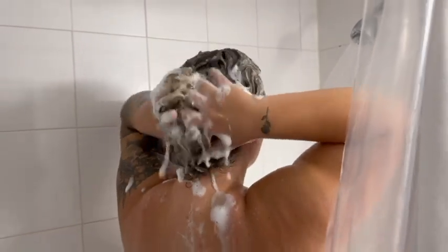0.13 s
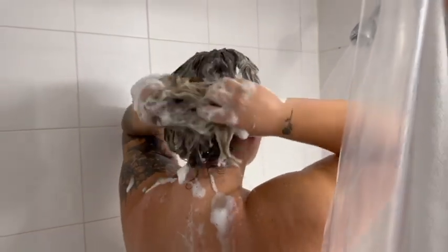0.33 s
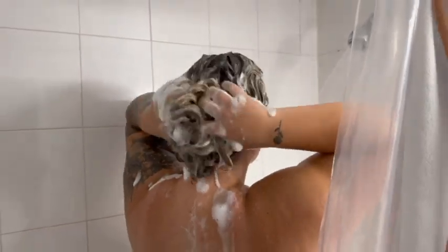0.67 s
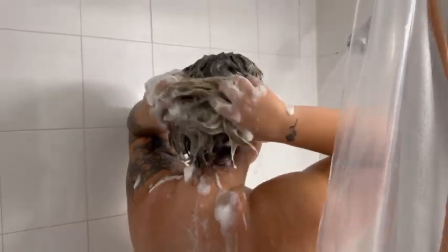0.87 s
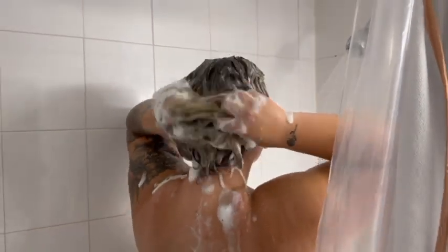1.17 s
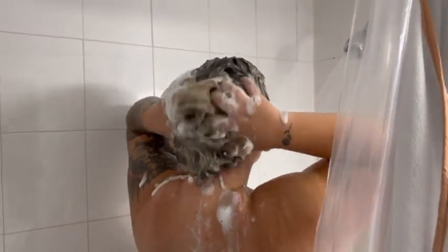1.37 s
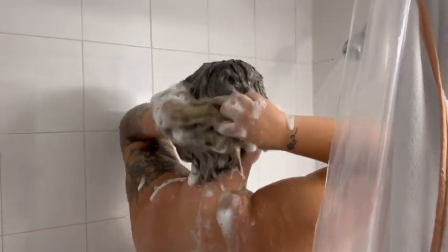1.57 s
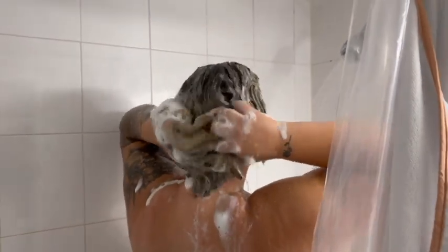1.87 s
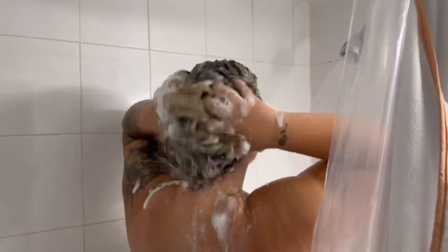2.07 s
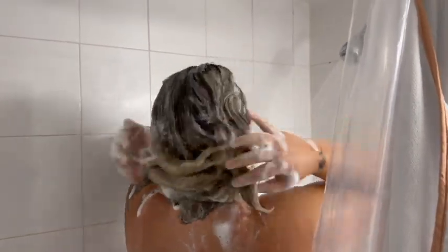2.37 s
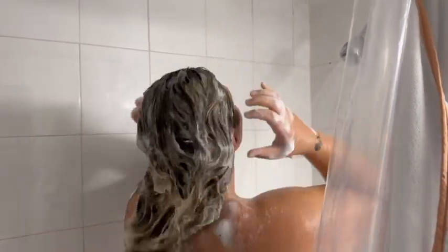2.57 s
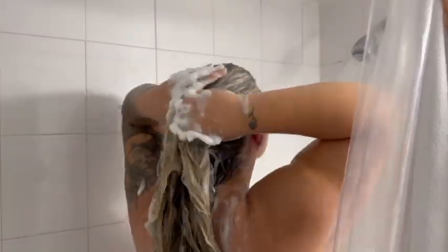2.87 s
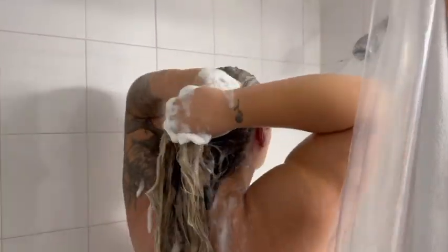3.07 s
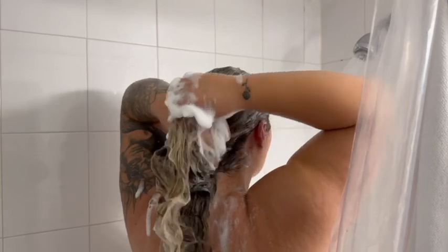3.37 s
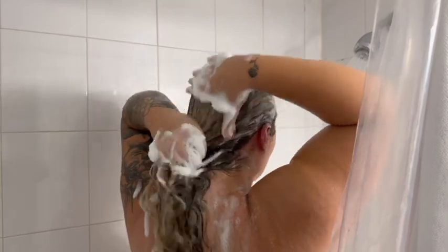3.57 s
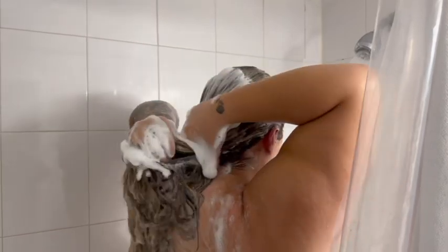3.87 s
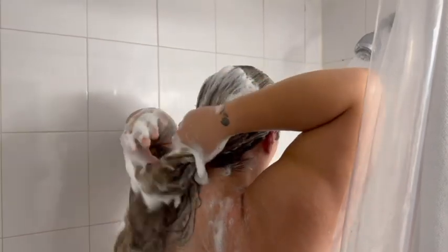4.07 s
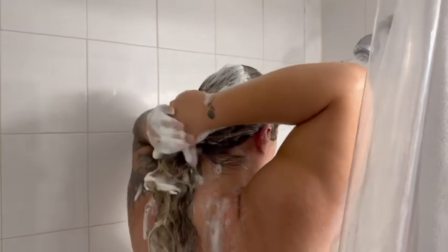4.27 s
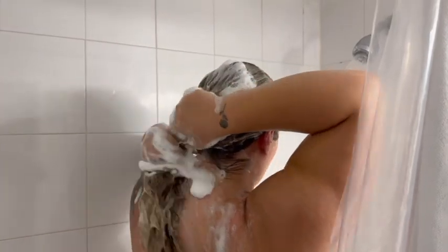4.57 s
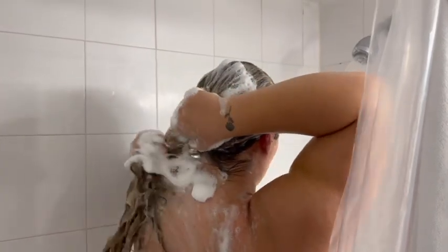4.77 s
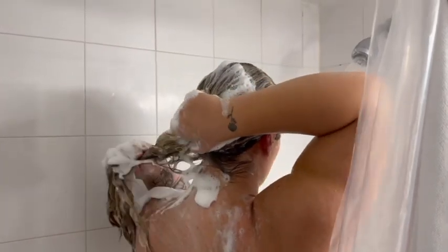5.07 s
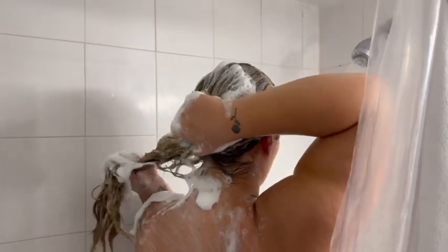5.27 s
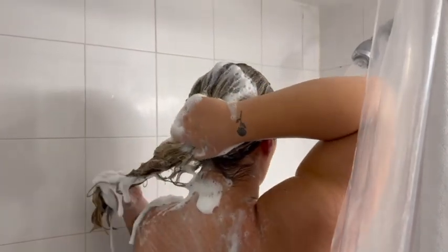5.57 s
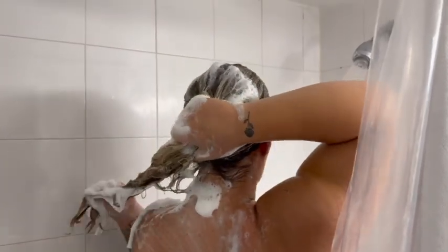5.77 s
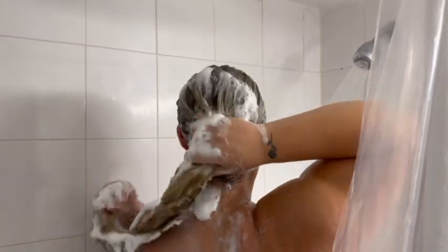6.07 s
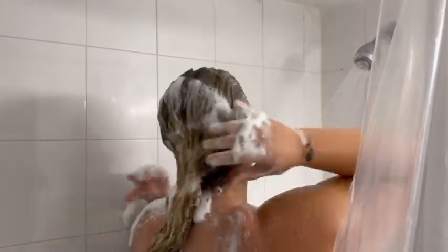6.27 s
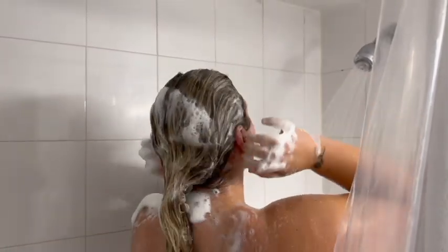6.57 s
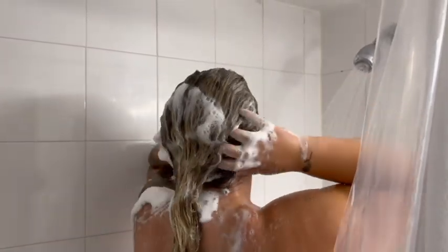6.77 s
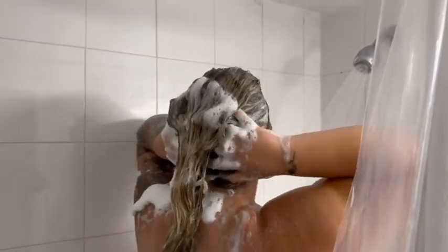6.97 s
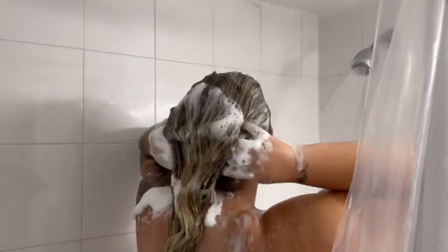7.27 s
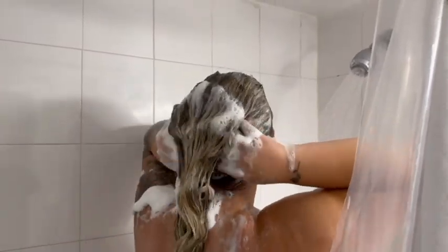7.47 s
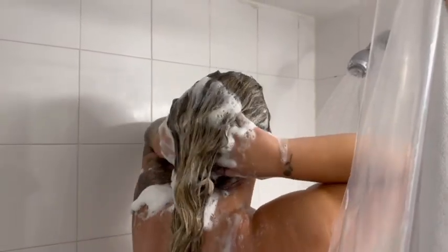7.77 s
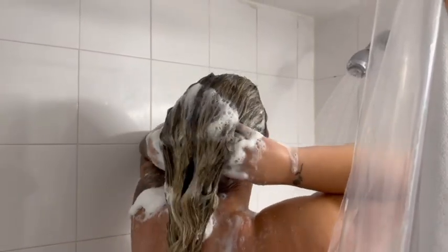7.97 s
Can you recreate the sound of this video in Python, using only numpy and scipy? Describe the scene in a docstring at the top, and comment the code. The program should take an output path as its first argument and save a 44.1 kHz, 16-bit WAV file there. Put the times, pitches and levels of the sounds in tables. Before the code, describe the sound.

A shower runs in a hard, short-echoing stall, heard by a nearby stereo microphone. Under it lies a low mechanical fan hum and a soft boomy air rumble that swells now and then. Hands working lather give sharp little squelchy splats, slightly stronger on the left. A sudden cut just before three seconds jumps to a fuller, hissier spray, which later fades back to a quieter patter with three low bubbles.

```python
"""From the start a fan hums as shaft harmonics; a tiled shower drums, patters and hisses as shaped noise.
Bubbles ring as rising sines. Hands work lather through wet hair, and blobs of foam and water splat on the
tiles as decaying noise bursts. At 2.74 s the sound breaks off and fades in louder; it later sinks slowly,
with three large bubbles from 6.4 s on."""
import sys
import numpy as np
from scipy import signal
from scipy.fft import rfft, irfft, next_fast_len
from scipy.io import wavfile
from scipy.ndimage import uniform_filter1d, map_coordinates

SR = 44100
rng = np.random.default_rng(int(sys.argv[2]) if len(sys.argv) > 2 else 0)


def generate_wav(sig):
    """Save sig (samples, or channels by samples) to the path in sys.argv[1] as 16-bit PCM at SR."""
    pcm = np.round(np.clip(np.atleast_2d(sig).T, -1, 1) * 32767).astype(np.int16)
    wavfile.write(sys.argv[1], SR, pcm)


N = 358517


def amp(db):
    """Decibel law: level to amplitude ratio."""
    return 10 ** (np.asarray(db) / 20)


def unit(x):
    """Normalisation to an rms of 1."""
    return x / np.sqrt(np.mean(x ** 2) + 1e-20)


def along(points, hz):
    """Logarithmic pitch scale: each column after the frequency, interpolated on a log axis."""
    f, *columns = np.transpose(points)
    return np.squeeze([np.interp(np.log(hz + 1), np.log(f + 1), c) for c in columns])


def curves(rows):
    """Linear interpolation in time: one value per sample for each column after the time."""
    s, *columns = np.transpose(rows)
    return [np.interp(np.arange(N) / SR, s, c) for c in columns]


def wobble(rate):
    """Band-limited fluctuation: a smooth random curve with `rate` knots a second."""
    knots = rng.standard_normal(int(N * rate / SR) + 4)
    return map_coordinates(knots, [np.arange(N) * rate / SR])


def filtered(x, response):
    """Linear filtering: the spectrum of x times a complex response of frequency."""
    m = next_fast_len(N + SR // 2)
    return irfft(response(np.fft.rfftfreq(m, 1 / SR)) * rfft(x, m), m)[..., :N]


def rush(spectrum, patchy_db, grain_db):
    """Superposed random impacts: two noises, jointly rms 1, sharing gain patches and rapid roughness."""
    drops = rng.standard_normal((2, N)) * amp(grain_db * wobble(300))
    z = signal.stft(drops, nperseg=512)[2]
    patches = uniform_filter1d(rng.standard_normal(z.shape[1:]), 6, 0)  # smooth in frequency
    patches = uniform_filter1d(patches, 10, 1)  # smooth in time
    pair = signal.istft(z * amp(patchy_db * unit(patches)), nperseg=512)[1][:, :N]
    return unit(filtered(pair, lambda hz: amp(along(spectrum, hz))))


# Level courses before each layer's offset: (time [s], drumming and fan level [dB], patter level [dB])
LOUDNESS = [(0, -44.5, -52.5), (1, -45, -53), (2.2, -43.5, -50.5), (2.737, -46, -52.5), (2.743, -36, -41.5),
            (3.5, -34.5, -43), (4.3, -35, -45.5), (5.3, -35.5, -48.5), (6, -39.5, -52), (6.5, -42, -54),
            (7.2, -42, -50.5), (8.13, -45.5, -53)]
# Harmonics of the fan shaft: (shaft order [-], relative level [dB])
FAN_ORDERS = [(2, -22), (5, -39), (8, 1.5), (9, -9), (10, -14.5), (13, -7.5), (14, -2.5), (16, -8),
              (18, -12.5), (22, -11.5), (24, -17), (26, -8.5), (32, -9.5), (38, -17), (52, -16)]
SHAFT_HZ = 25.895


def fan():
    """Rotating machinery: unsteady harmonics of the shaft rate, further apart in phase at higher orders."""
    t = np.arange(N) / SR
    hum = np.zeros((2, N))
    for order, db in FAN_ORDERS:
        apart = 0.066 * round(order) * np.array([[-.5], [.5]])  # left and right phase, rad
        phase = rng.uniform(0, 2 * np.pi) + 0.093 * wobble(3) + apart
        tone = np.sin(2 * np.pi * round(order) * SHAFT_HZ * t + phase)
        hum += amp(db + 0.14 * wobble(2.9)) * tone
    return amp(curves(LOUDNESS)[0] - 1.5) * unit(hum)


# Spectrum of water on the tub: (frequency [Hz], relative density [dB per Hz])
TUB_SPECTRUM = [(35, -23), (90, -15), (190, -2.5), (310, -3), (352, 7.5), (400, -1.5), (850, -7),
                (1300, -35), (4000, -36)]
DRUM_GROWS_DB_PER_S = 0.19  # growth relative to the fan


def drumming():
    """Impact noise on a tub: noise in the tub's spectrum, slowly gaining on the fan."""
    t = np.arange(N) / SR
    level_db = curves(LOUDNESS)[0] - 5.0 + DRUM_GROWS_DB_PER_S * t + 0.07 * wobble(10.0)
    return amp(level_db) * rush(TUB_SPECTRUM, patchy_db=1.8, grain_db=1.5)


# Spectrum of drops on skin and curtain: (frequency [Hz], relative density [dB per Hz])
PATTER_SPECTRUM = [(300, -45), (900, 2), (1300, 0.5), (1800, -1), (3200, -17), (16000, -64)]


def patter():
    """Soft-surface impact noise: drops on skin and curtain as band-shaped noise."""
    return amp(curves(LOUDNESS)[1]) * rush(PATTER_SPECTRUM, patchy_db=2.6, grain_db=1.5)


# Low air mode of the stall: (centre frequency [Hz], width of each resonator [Hz])
AIR_MODE = (131, 33)
# Swells of the air mode: (time [s], half length [s], rise [dB])
SWELLS = [(0.03, .1, 12), (0.512, 0.21, 12.5), (1.803, 0.29, 5.5), (2.493, 0.29, 9), (3.75, 0.7, 9.5),
          (5.144, 0.2, 10.5), (6.02, 0.057, 14), (7.255, 0.034, 9), (7.83, 0.26, 16.5)]
REST_DB = -21.5  # air mode at rest, against the drumming's level course


def air_mode():
    """Room resonance: noise through two equal cascaded resonators, swelling and fading."""
    t = np.arange(N) / SR
    centre_hz, width_hz = AIR_MODE

    def resonator(hz):
        damping = 1j * hz * width_hz
        return damping / (centre_hz ** 2 - hz * hz + damping)

    swell_db = sum(db * np.exp(-((t - s) / half_s) ** 2) for s, half_s, db in SWELLS)
    level_db = curves(LOUDNESS)[0] + REST_DB + swell_db + 2.2 * wobble(3.68)
    noise = rng.standard_normal((2, N))
    return amp(level_db) * unit(filtered(noise, lambda hz: resonator(hz) ** 2))


# Spectrum of the fine spray: (frequency [Hz], relative density [dB per Hz])
SPRAY_SPECTRUM = [(1000, -30), (2500, -3), (5300, -3), (7500, -1), (9200, 1), (10800, 0), (12000, -8),
                  (15500, -13)]
# Level course of the spray, before gusts: (time [s], level [dB])
SPRAY_LEVEL = [(0, -53.5), (1.3, -57.5), (1.9, -50.5), (2.25, -57.5), (2.737, -55.5), (2.743, -42.5),
               (3.3, -43.5), (3.8, -44.5), (4.25, -41.5), (4.7, -47.5), (5.05, -57), (6.4, -59.5),
               (6.8, -48.5), (7.25, -57.5), (8.13, -49.5)]


def spray():
    """Fine-droplet noise: treble hiss modulated by random gusts."""
    gusts_db = 1.5 * wobble(9)
    return amp(curves(SPRAY_LEVEL)[0] + gusts_db) * rush(SPRAY_SPECTRUM, patchy_db=2.8, grain_db=3)


# Spectrum of the nozzle hiss: (frequency [Hz], relative density [dB per Hz])
JET_SPECTRUM = [(8000, -40), (11000, -49), (12200, 3.5), (16000, 9)]


def nozzles():
    """Jet noise: hiss of the nozzles, slowly fluctuating about a constant level."""
    return amp(-51.0 + 3.9 * wobble(3.42)) * rush(JET_SPECTRUM, patchy_db=4, grain_db=2.5)


def chirp(hz, t, cycles):
    """Bubble resonance: a soft onset, a rising pitch and a decay, with a peak near 1."""
    age = 4 * t * hz / cycles
    return age * np.exp(1 - age) * np.sin(2 * np.pi * hz * t * (1 + 0.012 * age))


BUBBLE_HZ, BUBBLE_SPREAD = 899.7, 0.5  # median pitch Hz, standard deviation of natural-log pitch
BUBBLE_CYCLES, BUBBLE_DB = 24.8, -4  # life in cycles, level against the patter dB


def bubbles(count=800):
    """Bubble resonance in running water: short chirps at random moments, each on one side."""
    u, t = rng.random((count, 3)), np.arange(SR // 20) / SR
    hz = BUBBLE_HZ * np.exp(BUBBLE_SPREAD * rng.standard_normal((count, 1)))
    ring = amp(14 * u[:, :1]) * chirp(hz, t, BUBBLE_CYCLES)
    start = (u[:, 1:2] * N).astype(int)
    side = (u[:, 2:] > .5) * (N + SR)  # the right channel follows the left in one long array
    at = start + np.arange(len(t)) + side
    pair = np.bincount(at.ravel(), ring.ravel(), 2 * (N + SR)).reshape(2, -1)[:, :N]
    return amp(curves(LOUDNESS)[1] + BUBBLE_DB) * unit(pair)


# Decay of the tiles' answer: (frequency [Hz], 60 dB decay time [s])
TILES = [(1000, 0.21), (5000, 0.24), (15000, 0.14)]
# Fine droplets thrown by a blob: (centre frequency [Hz], width [octaves])
FIZZ = (9640, 0.31)
CLUMP_MS, CLUMP_DB = 6, 1.8  # spacing and depth of droplet clumps
RAGGED_DB, PEAKED = 2.2, 1.6  # droplet scatter in pitch; band shape: 1 sharp core, 2 round top


def burst(body_db, body_hz, octaves, fizz_db, rise_ms):
    """Impact and reverberation: clumped droplets in a body band, fizz or both, dying band by band off tiles."""
    noise = rng.standard_normal((2, SR // 5))
    hz, t, z = signal.stft(noise, SR, nperseg=256, noverlap=192)

    def band(centre_hz, width):
        distance = np.abs(np.log2((hz + 1) / centre_hz) / width)
        return unit(np.exp(-distance ** PEAKED))

    ragged = uniform_filter1d(rng.standard_normal(z.shape[1:]), size=24, axis=1)  # smooth in time
    ragged = uniform_filter1d(ragged, size=3, axis=0)  # smooth in frequency
    bands = amp(body_db) * band(body_hz, octaves) + amp(fizz_db) * band(*FIZZ)
    colour = bands[:, None] * amp(RAGGED_DB * unit(ragged - ragged.mean()))
    decay = amp(-60 * t / along(TILES, hz)[:, None])
    sound = signal.istft(z * colour * decay, SR, nperseg=256, noverlap=192)[1]
    t = np.arange(sound.shape[1]) / SR
    swell = (1 - np.exp(-4 * t / (abs(rise_ms) / 1000))) ** 2
    slap = 1 + 1.56 / (1 + abs(rise_ms)) * amp(-60 * t / 0.013)  # stronger for sudden bursts
    knots = np.r_[.8, .8, rng.standard_normal(58)]  # the first clump is firm
    clumps = amp(CLUMP_DB * np.interp(t * 1000 / CLUMP_MS, np.arange(60), knots))
    return amp(3.5) * swell * slap * clumps * sound


def bursts(rows):
    """Superposition: every burst is added at its own time."""
    out = np.zeros((2, N + SR))
    for s, *shape in rows:
        sound = burst(*shape)
        out[:, round(s * SR):][:, :sound.shape[1]] += sound
    return out[:, :N]


def spurts(count=140):
    """Random impacts: small bursts with negligible fizz, their level tied to the spray's."""
    u = rng.random((count, 4))
    s = u[:, 0] * (N - 1) / SR
    body_db = curves(SPRAY_LEVEL)[0][(s * SR).astype(int)] - 13 + 10 * u[:, 1]
    body_hz, octaves = 1800 * 5 ** u[:, 2], .12 + .3 * u[:, 3]
    fizz_db, rise_ms = np.full(count, -120), np.full(count, 8)
    return bursts(np.transpose([s, body_db, body_hz, octaves, fizz_db, rise_ms]))


# Bursts from blobs of foam and water, one or several rows a blob, levels before the burst's own gain:
# (time [s], body level [dB], body centre [Hz], body width [octaves], fizz level [dB], rise [ms])
SPLATS = [(0.093, -47, 7040, 0.13, -76, 4.5), (0.303, -39, 4800, 0.36, -56, 4),
          (0.352, -44.5, 7800, 0.29, -40, 22), (0.372, -43, 4570, 0.11, -60, 3),
          (0.526, -51.5, 5760, 0.34, -39.5, 3), (0.55, -38, 6800, 0.35, -64, 29),
          (0.592, -44.5, 2600, 1.3, -64, 14), (0.625, -44, 6460, 0.22, -69, 4.3),
          (0.713, -49, 2920, 0.19, -58, 2.5), (1.087, -28, 1830, 0.26, -55, 22),
          (1.09, -37, 3950, 0.4, -36.5, 11), (1.091, -33, 7400, 0.33, -57, 19),
          (1.395, -51, 7000, 0.56, -40, 3.7), (1.449, -47, 5640, 0.39, -41.5, 3.1),
          (1.574, -46, 7500, 0.22, -36, 36), (1.613, -45, 7200, 0.29, -50, 9.5),
          (1.71, -56, 5300, 0.073, -42, 6), (1.795, -42.5, 7000, 0.33, -73, 3.4),
          (1.924, -48, 13900, 0.21, -40, 0.81), (1.979, -43, 3700, 0.18, -60, 1.8),
          (2.012, -29.5, 7240, 0.49, -40, 10), (2.093, -43.5, 11900, 0.32, -60, 5),
          (2.231, -40.5, 7400, 0.42, -43.5, 14), (2.33, -82, 7000, 0.27, -38, 4.1),
          (2.481, -40, 12500, 1.5, -41.5, 24), (2.636, -48.5, 7400, 0.12, -39, 23),
          (2.878, -48, 5640, 0.62, -43.5, 4.9), (2.976, -67, 6000, .3, -39.5, 2.3),
          (3.051, -38.5, 5960, 0.55, -60, 5), (3.143, -40, 3930, 0.77, -60, 3.6),
          (3.171, -40, 4540, 0.52, -33, 1.3), (3.262, -39, 7500, 0.34, -40, 3.7),
          (3.29, -44.5, 5570, 0.46, -44, 9.3), (3.362, -41, 8040, 0.68, -35, 5.3),
          (3.476, -39, 7600, 0.92, -37, 3.1), (3.494, -49, 4400, .25, -55, 4),
          (3.56, -41, 3600, 0.5, -48, 13), (3.643, -63, 6000, 0.4, -38, 2.1),
          (3.793, -31.5, 3700, 0.35, -30.5, 12), (3.795, -41, 2100, 0.38, -60, 6.7),
          (3.822, -47, 3680, 0.09, -30, 2.7), (3.995, -35, 7250, 1.1, -41, 33),
          (4.073, -40.5, 5500, 0.34, -60, 2), (4.172, -40.5, 6350, 0.66, -38, 8.2),
          (4.224, -33, 4400, 1.8, -41, 7), (4.34, -34.5, 7340, 0.38, -47, 6.5),
          (4.432, -37.5, 3700, 1.4, -28.5, 4.2), (4.526, -40.5, 6040, 0.7, -35, 3.1),
          (4.556, -38, 6740, 0.34, -50, 6), (4.641, -50, 6500, 0.35, -33.5, 2.3),
          (4.702, -44.5, 5250, 1.3, -35, 2.4), (4.828, -47.5, 2860, 0.41, -49, 7),
          (4.877, -47, 7000, 1, -40, 19), (4.96, -41, 4660, 0.5, -78, 14),
          (5.292, -50, 5950, 1.2, -35.5, 5.7), (5.35, -48.5, 4960, 0.44, -60, 6.5),
          (5.413, -37.5, 7100, 0.44, -42, 7.2), (5.43, -34.5, 5230, 0.88, -45, 6.6),
          (5.672, -44.5, 7460, 0.74, -35, 26), (5.832, -39, 12300, 0.96, -47, 5.5),
          (5.864, -37.5, 2730, 1.44, -50, 5.2), (5.884, -44.5, 1940, 0.75, -54, 2.7),
          (6.039, -50, 12700, .3, -54, 3), (6.104, -50, 12000, 0.22, -51, 2.2),
          (6.14, -41, 1700, 0.3, -45.5, 2), (6.141, -53, 4900, 0.25, -60, 1.2),
          (6.234, -44, 2070, 0.65, -44, 1.2), (6.281, -44, 2450, 0.73, -40.5, 0.57),
          (6.365, -46, 12900, 0.23, -59, 4), (6.698, -45, 3000, 1, -36, 20),
          (6.767, -46, 4200, 0.77, -36, 6), (6.874, -40.5, 3550, 0.47, -39.5, 3.8),
          (6.992, -34.5, 5900, 0.6, -61, 2.2), (7.05, -39.5, 10600, 0.25, -55, 0.64),
          (7.185, -45.5, 4430, 0.24, -49, 1.8), (7.19, -41.5, 7650, 0.2, -63, 6.7),
          (7.361, -62, 7000, 0.24, -32, 65), (7.396, -53, 3150, .2, -56, 2.4),
          (7.524, -47, 3420, 0.31, -69, 6.5), (7.603, -55, 6000, 0.38, -40.5, 1.7),
          (7.694, -64, 7000, 0.34, -41.5, 9.9), (7.965, -44, 3600, 0.33, -38, 3.2),
          (7.966, -43, 6500, 0.32, -60, 4), (7.984, -44, 3600, 0.39, -64, 0.76),
          (8.017, -44, 12000, 0.26, -60, 1.3), (8.078, -49, 6700, 0.17, -46, 10),
          (8.091, -42.5, 4240, 0.55, -65, 2.2)]


def splats():
    """Impact of liquid masses: the bursts that stand out; a row is a body band, fizz or both."""
    return bursts(SPLATS)  # one blob may take several rows


# Single large bubbles, levels before the ports: (time [s], pitch [Hz], level [dB], life [cycles])
PLOPS = [(6.409, 797, -33.5, 12), (7.047, 443, -31.5, 4.6), (7.305, 800, -37, 12)]


def plops():
    """Bubble resonance of single large bubbles: chirps from one spot."""
    out, t = np.zeros((2, N)), np.arange(SR // 20) / SR
    for s, hz, db, cycles in PLOPS:
        out[0, round(s * SR):][:len(t)] += amp(db) * chirp(hz, t, cycles)
    return out


# Relation of the microphone ports:
# (frequency [Hz], left-right likeness [0-1], right lag [rad], left over right [dB])
PORTS = [(130, .86, .1, 2), (350, .45, 0, 1.5), (1000, .3, .6, 1.5), (3000, .15, .6, 4),
         (5500, .05, 1.3, 6.5), (7200, .4, 2.3, 5), (8500, .93, 3.1, 1), (10500, .75, 2.5, .7),
         (12000, .5, 2.6, .5), (13000, .35, 1.6, 0), (14200, .7, .35, 0), (15600, .93, 0, 0)]


def ports(pair):
    """Interchannel coherence: the right port hears a lagging share of the left's sound plus its own."""
    def right(hz):
        alike, lag, _ = along(PORTS, hz)
        alike = np.clip(alike, 0, 1)
        return np.array([alike * np.exp(-1j * lag), np.sqrt(1 - alike ** 2)])

    both = np.array([pair[0], filtered(pair, right).sum(axis=0)])
    return filtered(both, lambda hz: amp(np.outer([.5, -.5], along(PORTS, hz)[2])))


def scene():
    """Superposition: the water sounds pass the two ports, and the fan is added."""
    water = drumming() + patter() + air_mode() + spray() + nozzles()
    return fan() + ports(water + bubbles() + spurts() + splats() + plops())


# The break in the sound: (time [s], fade-in [s])
BREAK = (2.738, 0.04)
TOP_HZ = 15900  # band limit


def record(dry):
    """Gating and band limiting: the sound breaks off and fades in, with nothing above the limit."""
    break_s, fade_s = BREAK
    t = np.arange(N) / SR - break_s
    before = np.clip(-t / 0.019, 0, 1)
    after = np.clip(t / fade_s, 0, 1) ** 1.9
    gain = np.where(t < 0, before, after)
    return filtered(dry * gain, lambda hz: hz < TOP_HZ)


dry = scene()
out = record(dry)
generate_wav(out)
```